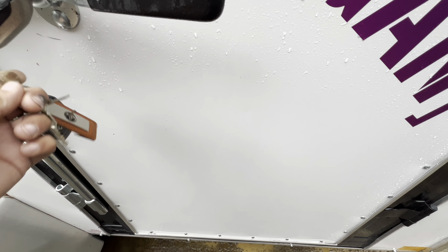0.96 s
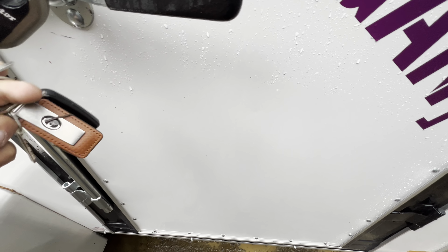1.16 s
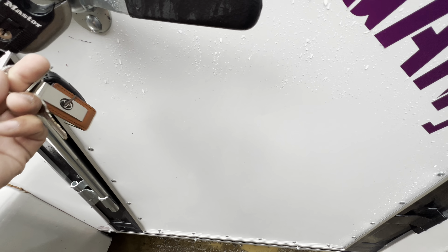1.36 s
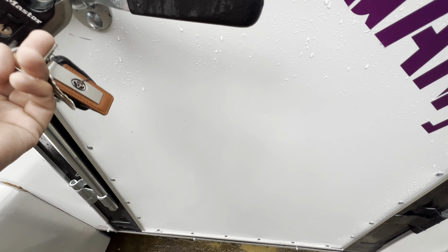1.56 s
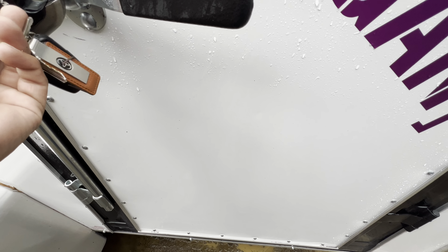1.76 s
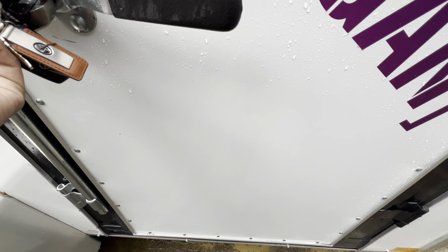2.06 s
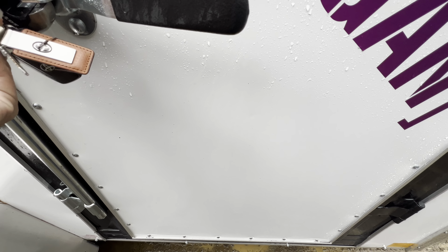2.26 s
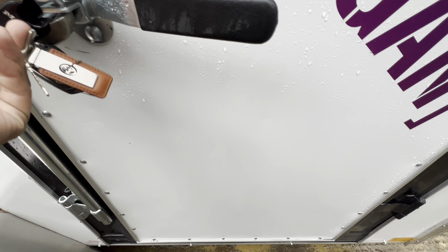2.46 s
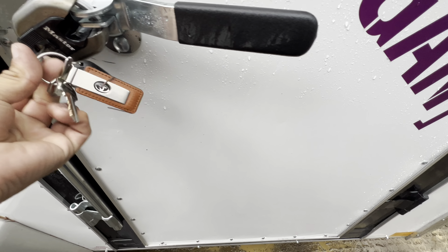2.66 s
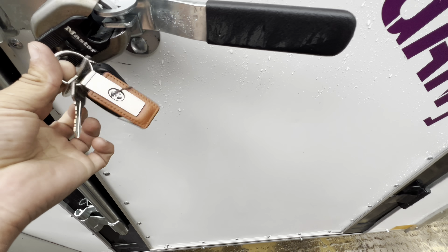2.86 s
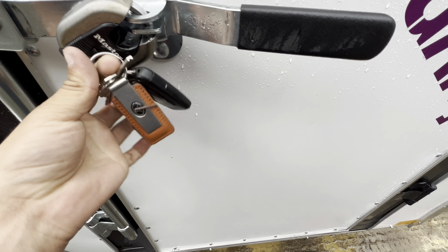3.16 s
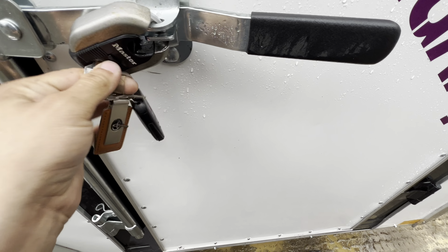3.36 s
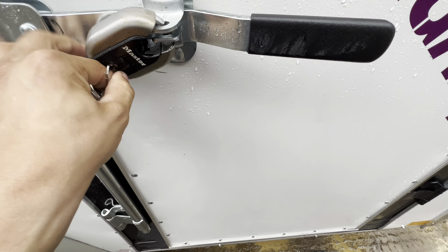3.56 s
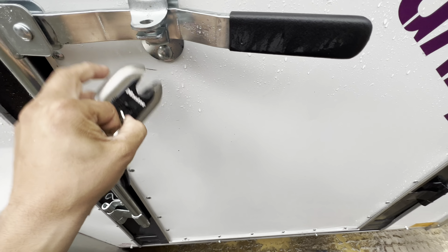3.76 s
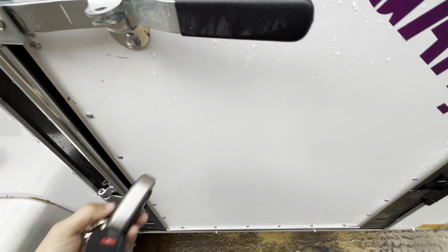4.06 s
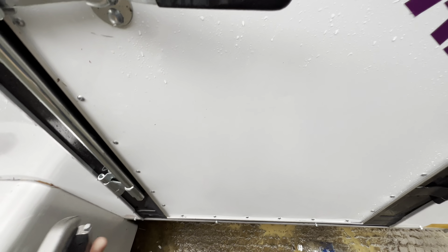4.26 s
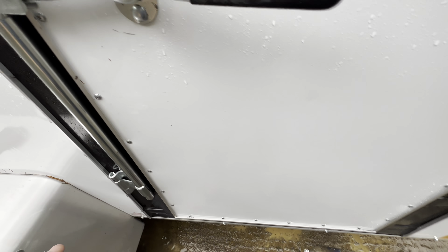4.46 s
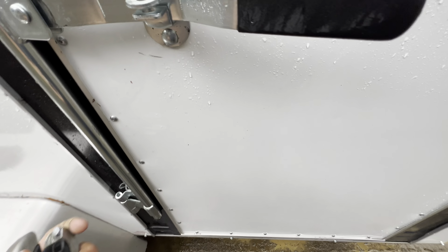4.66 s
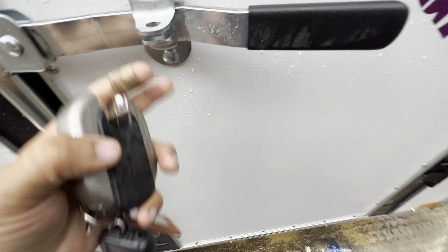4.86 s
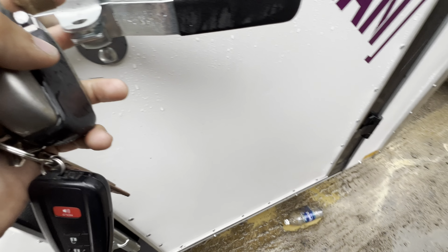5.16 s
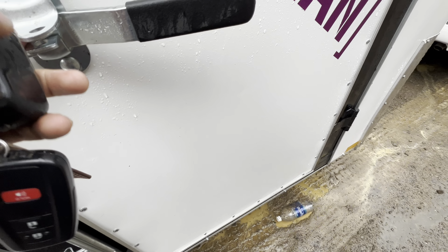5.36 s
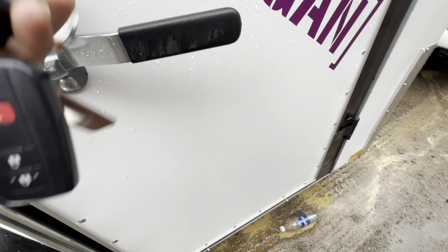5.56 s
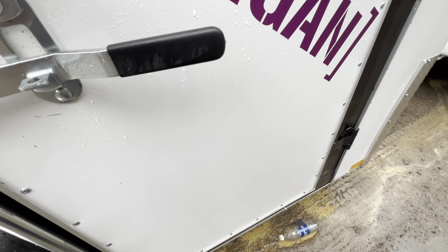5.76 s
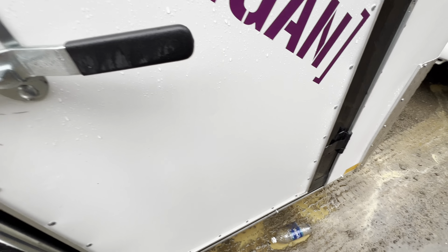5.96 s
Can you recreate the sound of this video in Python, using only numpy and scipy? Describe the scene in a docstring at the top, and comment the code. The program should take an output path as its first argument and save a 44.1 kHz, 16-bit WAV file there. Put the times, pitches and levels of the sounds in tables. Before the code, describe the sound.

Close stereo sound outdoors over a faint, low, slowly wavering hush of far traffic and open air. At 0 s a soft push thumps a hollow metal trailer door; tiny key ticks follow, with a clearer metallic ping at 0.55 s. It stays sparse, with small clicks and muted panel knocks until about 1.9 s. At 2.05 s a deep boom comes with a click and a short rub. From 2.8 to 3.1 s keys clink brightly and chatter against the lock; a hard clack lands at 3.3 s, and the padlock snaps free with a brief ring at 3.69 s. From 3.8 to 5.3 s light key jingles and ticks continue, with a bright click at 4.75 s. At 5.55-5.6 s the handle strikes the hasp in loud, gritty clanks with panel rattle, followed by dull clacks and one strong clunk at 5.87 s, then a last small knock.

```python
"""A soft push booms and rattles a metal trailer door over a gently wavering outdoor hush; light key ticks follow.
A hand works a bunch of keys in the door's padlock, takes the lock off and swings the handle.
Contacts are noise chatters through body resonances; keys, shackle, hasp and lock barrel ring as decaying sines.
Pushes drive the door's modes with noise and tiny taps; rubbing and rustling are filtered gritty noise."""
import sys
import numpy as np
from scipy import signal
from scipy.fft import rfft, irfft, next_fast_len
from scipy.io import wavfile
from scipy.ndimage import map_coordinates

SR = 44100
rng = np.random.default_rng(int(sys.argv[2]) if len(sys.argv) > 2 else 0)


def persist_wave(psi):
    """Save psi, clipped to +-1, as 16-bit WAV."""
    counts = np.round(np.clip(psi, -1, 1) * 32767).astype(np.int16)
    wavfile.write(sys.argv[1], SR, np.atleast_2d(counts).T)


N = 269010


def amp(db):
    """Gain of a level in dB."""
    return 10 ** (np.asarray(db) / 20)


def unit(x):
    """Scale to an RMS of 1."""
    return x / np.sqrt(np.mean(x ** 2) + 1e-20)


def along(points, hz):
    """Read a curve of (f/Hz, value) points on a log frequency axis."""
    f, v = np.transpose(points)
    return np.interp(np.log(hz + 1), np.log(f + 1), v)


def wobble(rate):
    """A smooth random curve with rate knots a second."""
    knots = rng.standard_normal(int(N * rate / SR) + 4)
    return map_coordinates(knots, [np.arange(N) * rate / SR])


def filtered(x, response):
    """Shape x by a complex response of frequency."""
    m = next_fast_len(x.shape[-1] + 8192)
    spectrum = rfft(x, m) * response(np.fft.rfftfreq(m, 1 / SR))
    return irfft(spectrum, m)[..., :x.shape[-1]]


def resonances(modes):
    """Causal response of (f/Hz, width/Hz, level/dB) modes, added with alternating sign."""
    def response(f):
        return sum((-1) ** k * amp(db) * 1j * f * width / (hz * hz - f * f + 1j * f * width)
                   for k, (hz, width, db) in enumerate(modes))
    return response


def below(top_hz, order):
    """Causal low-pass response."""
    b, a = signal.butter(order, top_hz, fs=SR)
    return lambda f: signal.freqz(b, a, f, fs=SR)[1]


def gritty(rate, depth_db):
    """Two noises whose common strength wanders at random, with rate knots a second."""
    return rng.standard_normal((2, N)) * amp(depth_db * wobble(rate))


def taps(rate):
    """Two trains of tiny blows at the same irregular moments, on average rate a second."""
    return unit((rng.random(N) < rate / SR) * rng.standard_normal((2, N)))


def driven(force, level_db, response):
    """A force of changing level through a body that rings on after it."""
    return filtered(amp(level_db) * force, response) / np.std(filtered(force, response))


def strokes(starts, holds, levels_db, rise_s, falls):
    """Level in dB of overlapping strokes: each rises, holds, then falls so many dB a second."""
    grid = np.arange(0, N / SR, .001)
    t = grid - starts[:, None]
    past_hold = np.maximum(t - rise_s - np.abs(holds[:, None]), 0)
    gains = np.clip(t / rise_s, 0, 1) * amp(levels_db[:, None] - falls * past_hold)
    level_db = 10 * np.log10(np.sum(gains ** 2, 0) + 1e-14)
    return np.interp(np.arange(N) / SR, grid, level_db)


# phase by which the left port leads the right: f/Hz, lead/rad
PORT_LEADS = [(200, 0), (1380, -3.2), (1800, -.3), (4100, -.8), (5400, -2.8), (7800, -.2), (9400, -1.6),
              (16000, -1.8)]
# how much louder the left port is than the right: f/Hz, level/dB
PORT_LEVELS = [(150, .5), (500, 5), (1030, 0), (1720, 8), (3000, 1), (9500, -2), (14000, 0)]
# likeness of the two ports: f/Hz, likeness (0-1)
PORT_LIKENESS = [(230, .995), (520, .75), (2500, .92), (4600, .6), (9500, .96), (14000, .85)]


def ports(pair, scatter):
    """Each port hears the first sound plus or minus a share of its unrelated twin, at its own phase and level."""
    def shares(f):
        turn = np.arccos(along(PORT_LIKENESS, f) ** scatter) / 2
        return np.array([np.cos(turn), np.sin(turn)])

    half = np.array([[.5], [-.5]])  # each port takes half of the difference

    def port_response(f):
        return amp(half * along(PORT_LEVELS, f)) * np.exp(1j * half * along(PORT_LEADS, f))

    main, twin = filtered(pair, shares)
    return filtered(np.array([main + twin, main - twin]), port_response)


# relative spectrum of the outdoor bed: f/Hz, level/dB (per Hz)
HUSH_SPECTRUM = [(30, -16), (86, 8), (319, -12.5), (822, -8), (1280, -17.5), (2610, -15.5), (6210, -16.5),
                 (10500, -25), (11700, -63)]
HUSH_DB = -51


def hush():
    """Far traffic and open air: noise under a fixed spectrum, slowly wavering."""
    air = gritty(3, depth_db=1.2)
    return amp(HUSH_DB) * unit(filtered(air, lambda f: amp(along(HUSH_SPECTRUM, f))))


# bending modes of the door sheet: f/Hz, width/Hz, relative level/dB
SHEET_MODES = [(242.9, 25, -6.5), (284.6, 5.3, -4.5), (345.2, 40, -5), (424.1, 19, 1), (480.7, 6, -2.5),
               (543.4, 43, -6.5), (638.5, 94, -9), (737.7, 13.4, -3), (807, 268, -15)]


def sheet(f):
    """The door sheet answers in its modes and hardly at all above them."""
    return resonances(SHEET_MODES)(f) * below(1400, order=2)(f)


# bending modes of the whole door: f/Hz, width/Hz, relative level/dB
BOOM_MODES = [(74.7, 26.5, 32), (183, 69, 0)]
# pushes of hand and lock on the door: t/s, hold/s, panel rattle level/dB, boom level/dB
DOOR_PUSHES = [(0, 0.0022, -36, -36.5), (0.406, 0.064, -40.5, -44), (0.504, .13, -34.5, -43),
               (0.762, 0.038, -40.5, -40), (1.602, 0.0071, -42, -41), (1.715, 0.083, -41, -41.5),
               (1.887, 0.093, -41, -50), (2.05, 0.01, -27, -18.5), (2.153, 0.0045, -33, -47),
               (2.48, 0.0075, -36, -46), (2.619, 0.0041, -35, -46), (2.861, 0.0048, -27.5, -32.5),
               (3.023, 0.0026, -32.5, -30.5), (3.154, 0.0069, -37.5, -46), (3.287, 0.12, -26, -37.5),
               (3.391, 0.12, -31.5, -53), (3.587, 0.005, -30, -42), (3.639, 0.05, -27.5, -56),
               (4.551, 0.0059, -46, -60), (4.905, 0.01, -44, -43), (5.231, 0.075, -41.5, -57),
               (5.408, 0.038, -34, -55), (5.563, 0.053, -24.5, -36), (5.736, 0.1, -33, -46.5),
               (5.835, 0.088, -32, -42)]
RATTLE_RISE_S, RATTLE_FALLS_DB_PER_S = 0.001, 125
BOOM_RISE_S, BOOM_FALLS_DB_PER_S = .03, 158
TREMBLE_DB, LOCK_OFF_S = -47, 3.84  # the door hums faintly while the lock is held against it


def door():
    """Pushes through the lock shake the door: noise drives a low boom, tiny taps rattle the sheet modes."""
    s, held, rattles, booms = np.transpose(DOOR_PUSHES)
    panel_db = strokes(s, held, rattles, RATTLE_RISE_S, RATTLE_FALLS_DB_PER_S)
    boom_db = strokes(s, held, booms, BOOM_RISE_S, BOOM_FALLS_DB_PER_S)
    since_off = np.maximum(np.arange(N) / SR - LOCK_OFF_S, 0)
    tremble_db = TREMBLE_DB - BOOM_FALLS_DB_PER_S * since_off
    bending = filtered(gritty(14, depth_db=1), lambda f: resonances(BOOM_MODES)(f) * below(400, order=2)(f))
    boom = np.hypot(amp(boom_db), amp(tremble_db)) * unit(bending)

    shaken = driven(taps(400), panel_db, sheet)
    low = filtered(shaken, lambda f: 1 / (1 + (f / 520) ** 4))
    high = shaken - low
    panel = low + amp(0.66 * (panel_db + 35.0)) * high  # soft pushes hold back the high modes
    return boom + panel


# lock body dragged over the hasp: f/Hz, width/Hz, relative level/dB
RUB_MODES = [(1610, 660, -3), (2280, 260, 1), (3020, 1300, -5)]
# keys sliding on their ring: f/Hz, width/Hz, relative level/dB
RUSTLE_MODES = [(5610, 910, 25), (11100, 610, 17)]
# keys and lock sliding, levels before each layer's trim: t/s, hold/s, lock rub level/dB, key rustle level/dB
SLIDE_STROKES = [(0.448, 0.0079, -72, -58), (2.04, 0.022, -44, -58.5), (2.801, 0.061, -44.5, -49.5),
                 (2.918, 0.09, -48, -54), (3.085, 0.11, -58.5, -63), (3.278, 0.21, -48.5, -56.5),
                 (3.625, 0.011, -34, -46.5), (4.018, 0.082, -59.5, -56), (4.264, 0.15, -62, -56.5),
                 (4.544, 0.031, -55, -58.5), (4.714, 0.014, -60, -54), (4.805, 0.0038, -59, -56),
                 (5.218, 0.046, -52, -67), (5.548, 0.039, -28.5, -46), (5.765, 0.11, -41, -58.5)]
SLIDE_RISE_S, SLIDE_FALLS_DB_PER_S = .02, 332


def slides():
    """Lock and keys rub and rustle in fine grains; tiny taps make the key modes shimmer."""
    s, held, rubs, rustles = np.transpose(SLIDE_STROKES)
    rub_db = strokes(s, held, rubs, SLIDE_RISE_S, SLIDE_FALLS_DB_PER_S)
    rustle_db = strokes(s, held, rustles, SLIDE_RISE_S, SLIDE_FALLS_DB_PER_S)

    def rub_response(f):
        return resonances(RUB_MODES)(f) * f / (f + 1100j) * below(6000, order=2)(f)

    def rustle_response(f):
        return resonances(RUSTLE_MODES)(f) * f / (f + 5000j) * below(10400, order=8)(f)

    rub = unit(filtered(gritty(200, depth_db=3.0), rub_response))
    rustle = unit(filtered(gritty(200, depth_db=6.5), rustle_response))
    # lively keys, free of the lock, keep ringing
    shimmer_db = 2 * rustle_db + 61.5 + np.clip(rustle_db - rub_db, -30, 0)
    shimmer = 0
    for hz, db, _ in KEY_MODES:
        force = taps(250)
        mode_db = shimmer_db + db + 6 * wobble(20)  # each mode comes and goes
        shimmer = shimmer + driven(force, mode_db, lambda f: resonances([(hz, 170, 0)])(f) ** 2)
    return amp(rub_db + 2.5) * rub + amp(rustle_db + 13.5) * rustle + shimmer


def rings(blows, modes, loose, free):
    """Blows ring sine modes; loose grip varies level and pitch and shortens the ring; a hand stops it after free s."""
    out, t = np.zeros((2, N + SR)), np.arange(SR // 2) / SR
    for s, db in blows:
        start = round(s * SR)
        for hz, level, t60 in modes:
            flutter = map_coordinates(rng.standard_normal(60), [t * 118])
            gripped_t60 = t60 * (1 - .4 * loose)
            grip, detune = rng.standard_normal(2)
            strength_db = db + level + 6 * loose * (grip + flutter)
            decay_db = 60 * t / gripped_t60 + 2000 * np.maximum(t - free, 0)
            cycles = hz * (1 + .008 * loose * detune) * t + rng.random((2, 1))
            attack = np.minimum(t * 1000, 1)
            out[:, start:start + len(t)] += amp(strength_db - decay_db) * attack * np.sin(2 * np.pi * cycles)
    return out[:, :N]


# the key tip pings the lock barrel: t/s, level/dB (before grip varies it)
BARREL_BLOWS = [(.556, -21.5), (5.427, -31)]
# barrel mode: f/Hz, relative level/dB, t60/s (before grip shortens it)
BARREL_MODES = [(2420, 0, 0.069)]


def pin():
    """The key tip sets the lock barrel ringing in a single mode."""
    return rings(BARREL_BLOWS, BARREL_MODES, loose=.35, free=.05)


# keys swinging against each other: t/s, level/dB (before grip varies it)
KEY_CLINKS = [(4.4, -32), (4.175, -43.5), (5.5, -45.5), (3.8, -44.5), (4.407, -43), (2.865, -34),
              (2.945, -29)]
# key modes: f/Hz, relative level/dB, t60/s (before grip shortens it)
KEY_MODES = [(6130, -2, .1), (8882, -6, .15), (9356, -3, .15), (10160, -5, .12), (13610, -12, .15),
             (14770, -9, .12)]


def keys():
    """Keys tinkle as they swing together, loosely held and so unsteady in level and pitch."""
    return rings(KEY_CLINKS, KEY_MODES, loose=.6, free=.09)


# the padlock snaps free: t/s, level/dB (before grip varies it)
SHACKLE_SNAPS = [(3.689, -19)]
# shackle modes: f/Hz, relative level/dB, t60/s (before grip shortens it)
SHACKLE_MODES = [(3720, -10, .09), (6794, 0, .3), (9948, -6, .17), (12540, -17, .16)]
# the handle strikes the hasp: t/s, level/dB (before grip varies it)
HASP_STRIKES = [(5.556, -26.5), (5.599, -11.5)]
# hasp modes: f/Hz, relative level/dB, t60/s (before grip shortens it)
HASP_MODES = [(5140, -3, .06), (8355, -9, .04), (9502, 0, .06), (9900, -15, .25), (12690, -10, .08)]


def lock():
    """The shackle rings as the padlock snaps free, the hasp as the handle strikes it."""
    shackle = rings(SHACKLE_SNAPS, SHACKLE_MODES, loose=.1, free=.13)
    hasp = rings(HASP_STRIKES, HASP_MODES, loose=.2, free=.08)
    return shackle + hasp


# harder contacts of keys, lock and handle: t/s, relative level/dB, body pitch f/Hz, relative brightness level/dB
HARD_CONTACTS = [(0.474, -32, 3550, -3.5), (0.551, -17, 2440, -8.5), (0.757, -28, 1620, -11.5),
                 (1.345, -28, 2320, -10.5), (1.7979, -26.5, 3140, -3.5), (1.8882, -20, 3150, -7.5),
                 (2.0455, -24.5, 2030, -6.5), (2.0785, -14, 1550, 0), (2.5855, -20.5, 2440, -36.5),
                 (2.62, -30, 1670, -5), (2.825, -10.5, 2800, -3.5), (2.85, -16, 2380, -12),
                 (2.86, -14, 2150, -9), (2.917, -21, 2440, -12), (2.934, -15.5, 2300, 7),
                 (2.9445, -15, 2430, 9.5), (3.0129, -17, 1700, -7.5), (3.033, -8.5, 2550, -6.5),
                 (3.2837, -15, 1660, -15.5), (3.309, -1.5, 1723, -8.5), (3.386, -23, 2200, -8),
                 (3.4214, -20, 2900, -3), (3.437, -21, 1720, -4), (3.6398, -15, 1540, -7),
                 (3.6628, -13.5, 1590, -4.5), (3.69, -5, 2180, -1), (3.826, -12.5, 2730, -1),
                 (4.156, -25.5, 2900, -5), (4.2966, -26, 2170, 4.5), (4.393, -23.5, 3230, -2),
                 (4.5671, -28, 2830, -6.5), (4.7549, -10.5, 3500, 8), (4.9058, -36.5, 1730, -11),
                 (5.1542, -30.5, 2640, -6.5), (5.295, -28, 2250, -38), (5.4258, -20, 1960, -20),
                 (5.5555, -7, 2260, -10.5), (5.569, -6.5, 2240, -15), (5.591, -1.5, 2760, -9),
                 (5.6, -5, 2870, -3), (5.775, -17.5, 2700, -28), (5.8006, -11.5, 2320, -23.5),
                 (5.833, -9, 2320, -45), (5.8663, 0, 2640, -11), (5.926, -17.5, 1480, -5)]
# light ticks of one key on another: t/s, relative level/dB
KEY_TICKS = [(0.1357, -29.5), (0.319, -32), (1.182, -32.5), (2.812, -28), (2.974, -29), (3.154, -24.5),
             (3.2075, -31.5), (4.027, -29), (4.0345, -22), (4.137, -37), (4.194, -34.5), (4.2748, -28.5),
             (4.7165, -33.5), (4.742, -30), (4.792, -33)]
TICK_HZ, TICK_BRIGHT_DB = 3140, 1
SNAP_S = .0011  # time to the peak of a contact
REBOUND_S, REBOUND_DB = 0.0049, -10.5  # two bounces, on average this far apart and this much weaker each


def pulse(u):
    """Force of one contact: a quick rise to 1 at SNAP_S, then a smooth decay."""
    u = np.maximum(u, 0) / SNAP_S
    return u * np.exp(1 - u)


def contacts():
    """A short chatter rings the struck part's body pitch; brighter contacts carry more treble and less door thump."""
    out, t = np.zeros((2, N + SR)), np.arange(SR // 8) / SR
    linger = amp(-15 - 60 * t / 0.06) * (1 - np.exp(-t / SNAP_S))  # the body lingers
    dull, bright = below(3330, order=2), below(12500, order=6)
    edge_modes = resonances([(5500, 3500, 0), (9200, 2200, -1.5)])
    air_mode = resonances([(14200, 4000, 0)])
    ticks = [(s, db, TICK_HZ, TICK_BRIGHT_DB) for s, db in KEY_TICKS]
    for s, db, hz, bright_db in HARD_CONTACTS + ticks:
        noise = rng.standard_normal((2, len(t)))
        gaps, sizes = rng.random((2, 2))
        delays = REBOUND_S * np.cumsum(.5 + gaps)
        losses = REBOUND_DB * np.cumsum(.5 + sizes)
        snap = pulse(t) + sum(amp(loss) * pulse(t - late) for late, loss in zip(delays, losses))
        shape = snap + linger
        chatter = noise * shape
        body_modes = resonances([(hz, .16 * hz, 0), (1.5 * hz, .5 * hz, -7), (.6 * hz, .6 * hz, -11)])
        body = unit(filtered(chatter, lambda f: dull(f) * body_modes(f)))
        edge = unit(filtered(noise * (snap + shape), lambda f: bright(f) * edge_modes(f)))
        air = unit(filtered(noise * snap, lambda f: air_mode(f) ** 2))
        knock = unit(filtered(chatter, sheet))  # dull, heavy contacts thump the door
        treble = edge + amp(2.2 * bright_db - 13.0) * air
        click = amp(-.45 * bright_db - 12.0) * knock + body + amp(1.43 * bright_db + 7.5) * treble
        start = round(s * SR)
        out[:, start:start + len(t)] += amp(db - 23.5) * unit(click)
    return out[:, :N]


def scene():
    """Handling sounds at the ports' own likeness, over a more scattered hush."""
    ringing = None
    clicks = contacts()
    ringing = keys() + lock() + pin()
    handling = clicks + ringing + door() + slides()
    return ports(handling, scatter=1) + ports(hush(), scatter=2)


TOP_HZ = 16500  # nothing remains above this


def record(dry):
    """The loudest blows saturate softly; the treble fades out over the last 800 Hz below TOP_HZ."""
    saturated = dry / (1 + dry ** 4) ** (1 / 4)
    return filtered(saturated, lambda hz: np.clip((TOP_HZ - hz) / 800, 0, 1) ** 2)


dry = scene()
out = record(dry)
persist_wave(out)
```